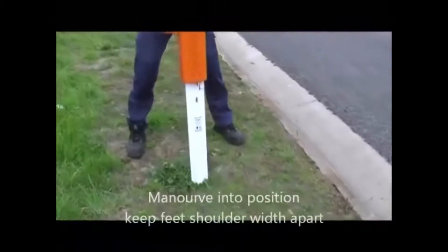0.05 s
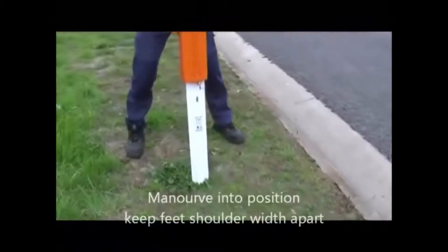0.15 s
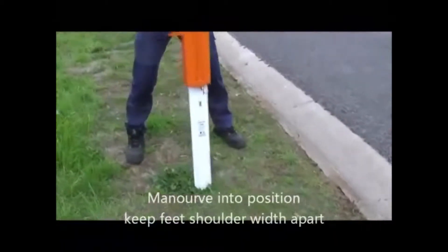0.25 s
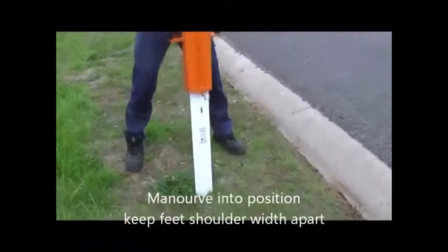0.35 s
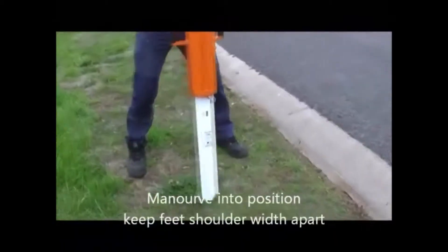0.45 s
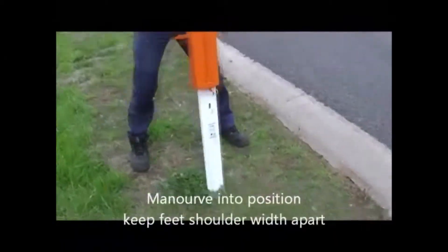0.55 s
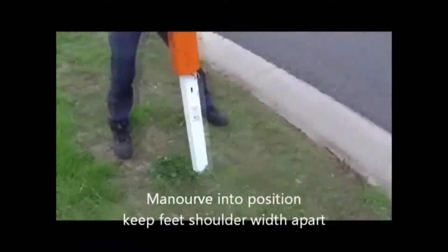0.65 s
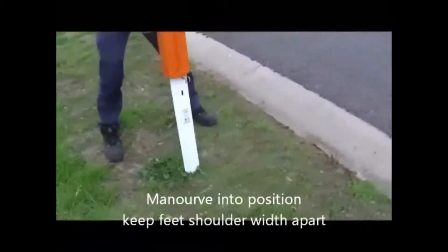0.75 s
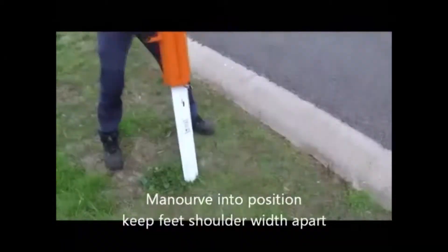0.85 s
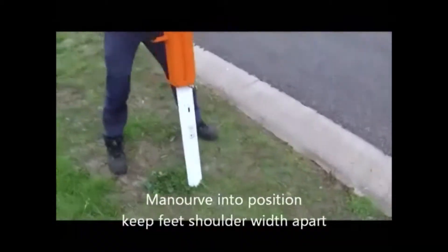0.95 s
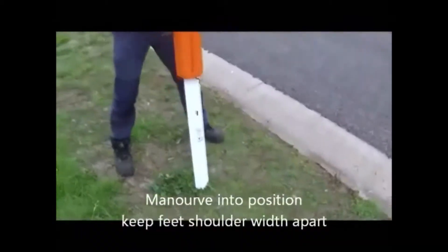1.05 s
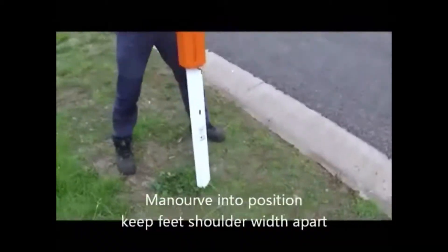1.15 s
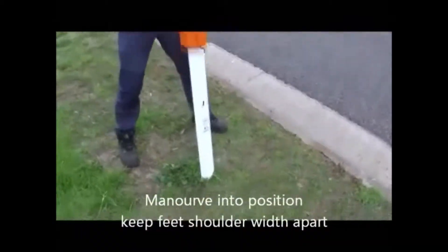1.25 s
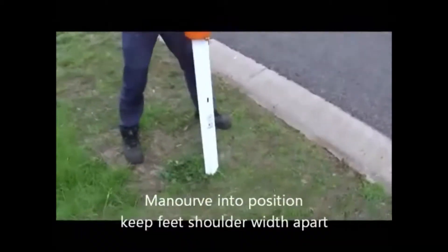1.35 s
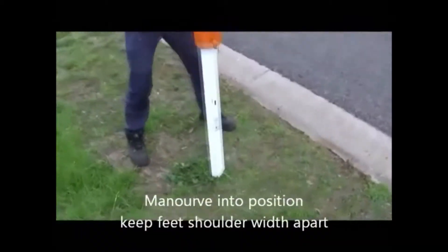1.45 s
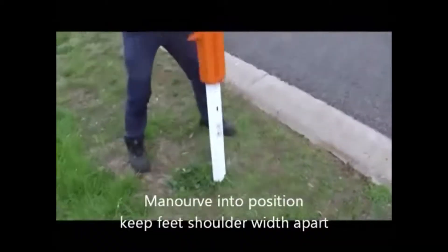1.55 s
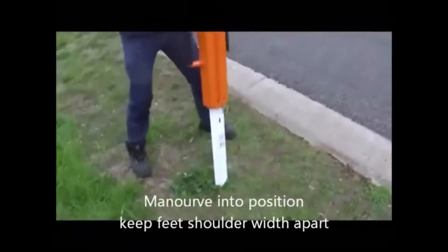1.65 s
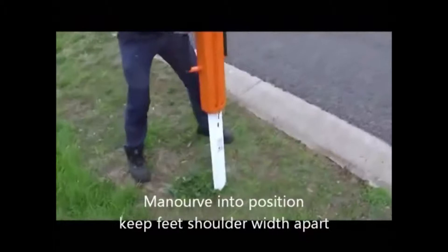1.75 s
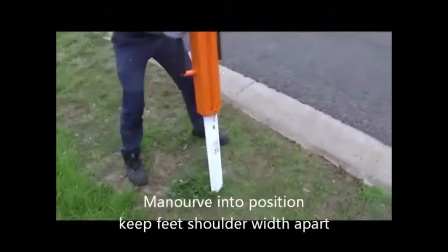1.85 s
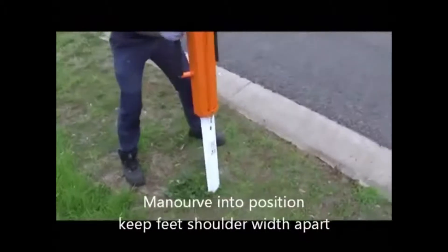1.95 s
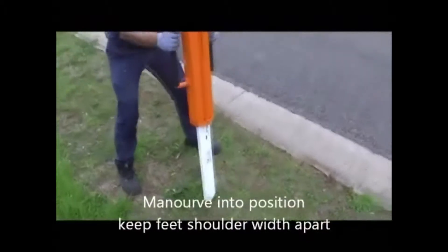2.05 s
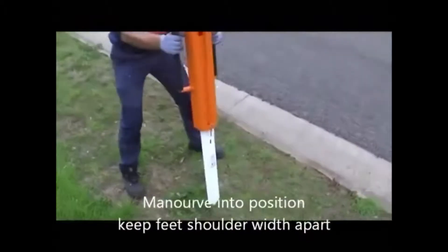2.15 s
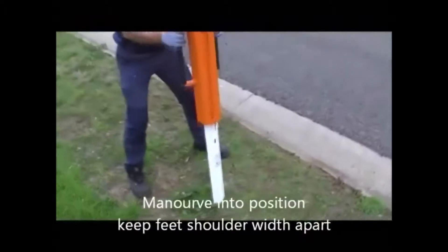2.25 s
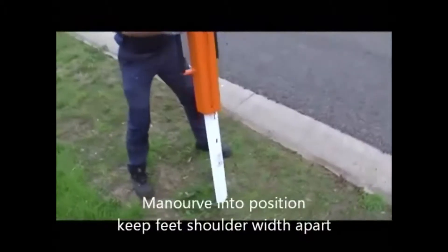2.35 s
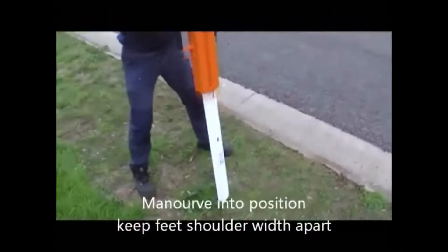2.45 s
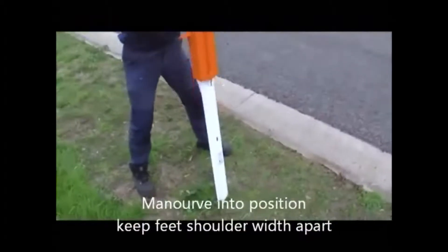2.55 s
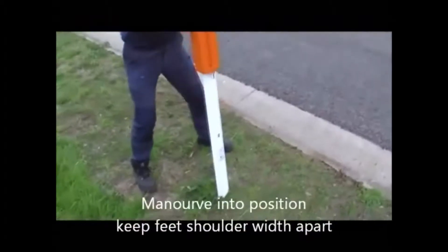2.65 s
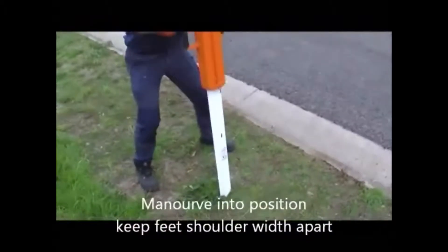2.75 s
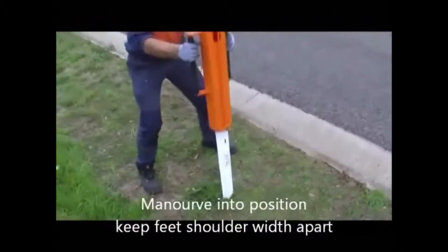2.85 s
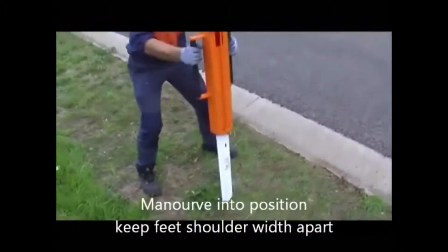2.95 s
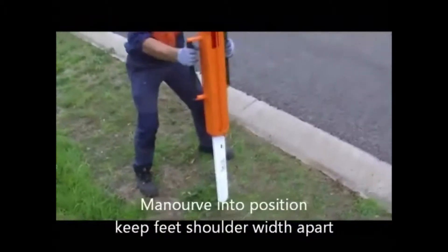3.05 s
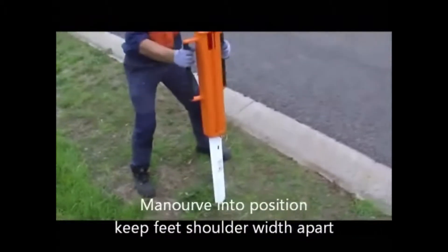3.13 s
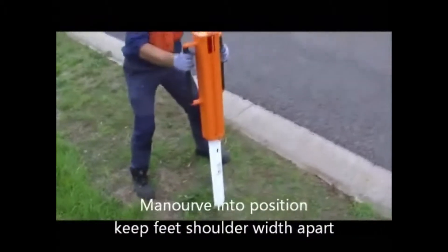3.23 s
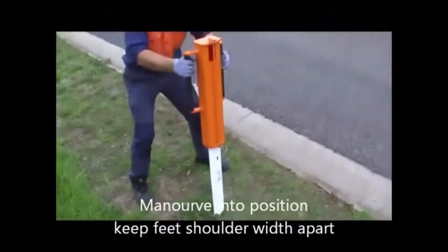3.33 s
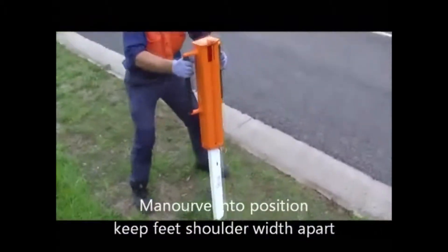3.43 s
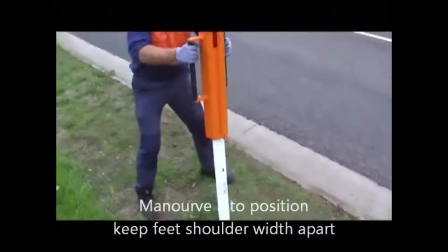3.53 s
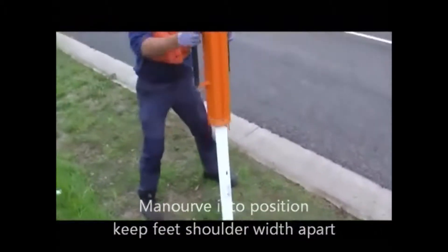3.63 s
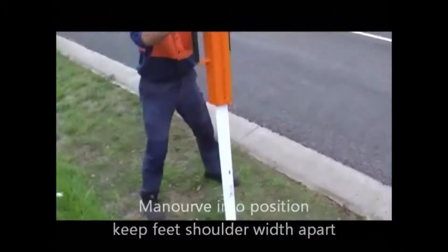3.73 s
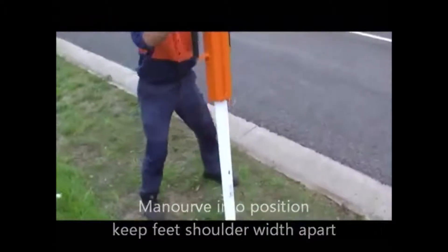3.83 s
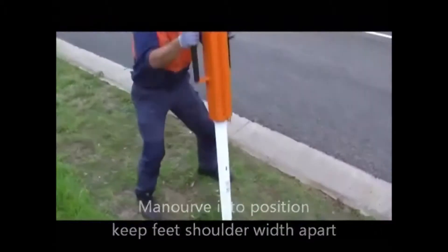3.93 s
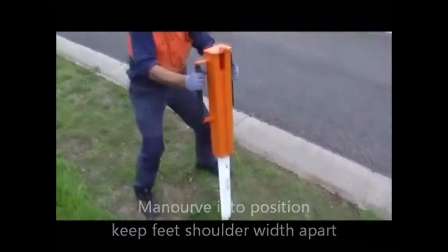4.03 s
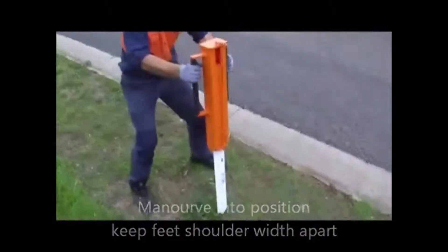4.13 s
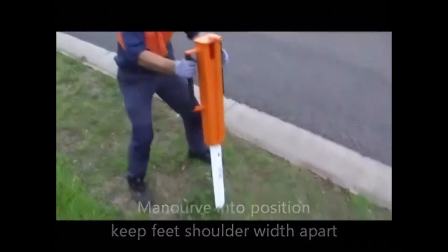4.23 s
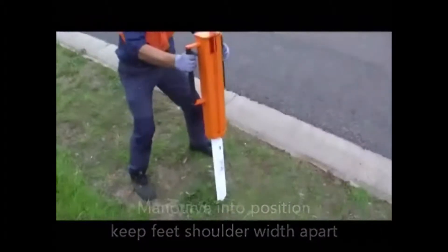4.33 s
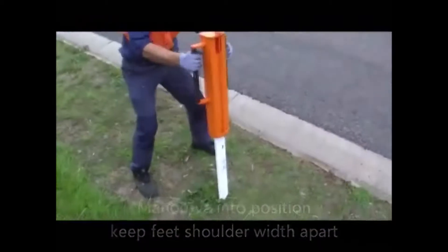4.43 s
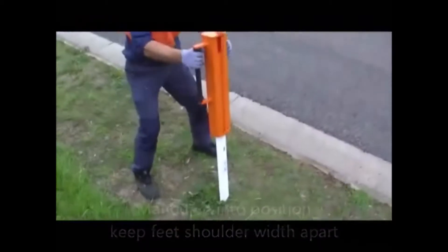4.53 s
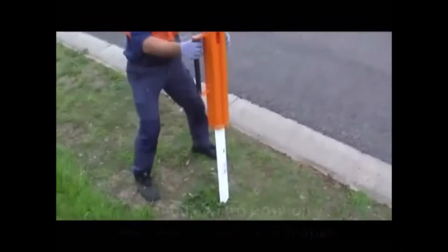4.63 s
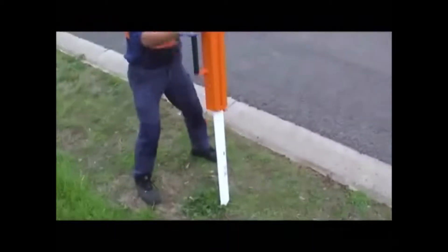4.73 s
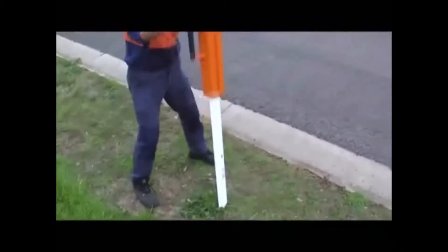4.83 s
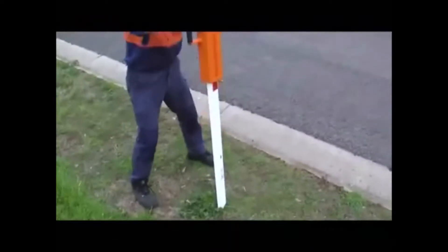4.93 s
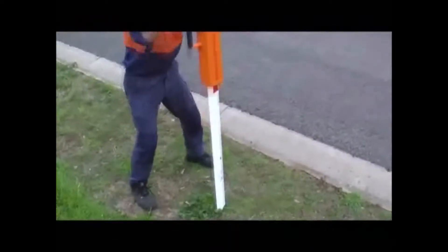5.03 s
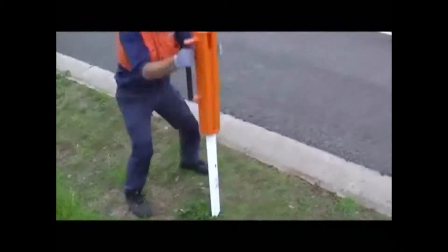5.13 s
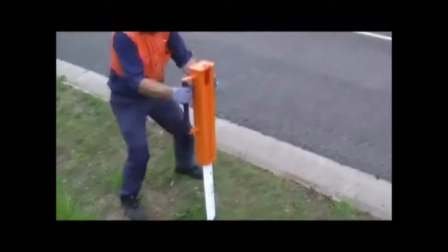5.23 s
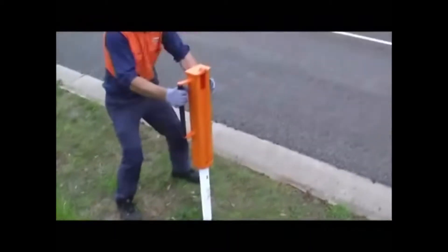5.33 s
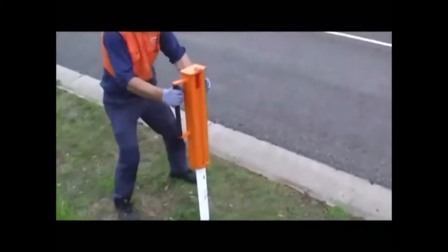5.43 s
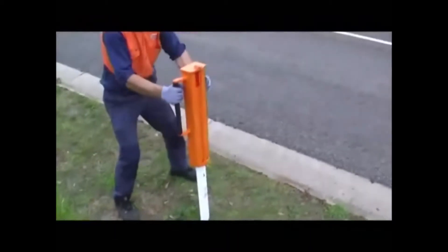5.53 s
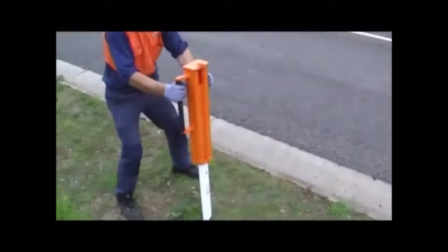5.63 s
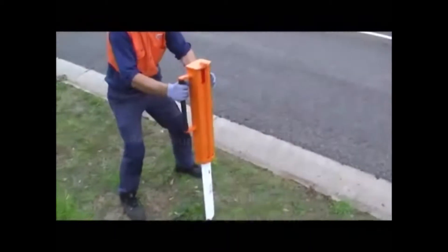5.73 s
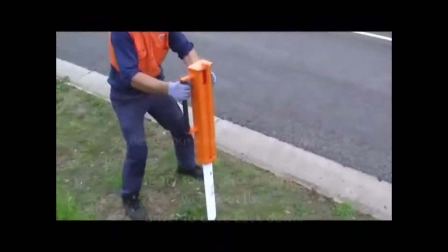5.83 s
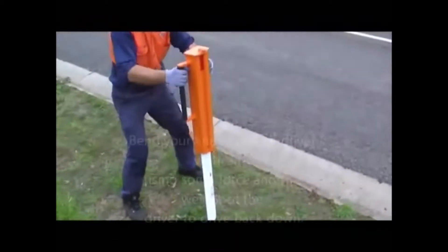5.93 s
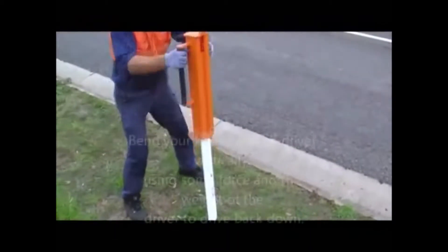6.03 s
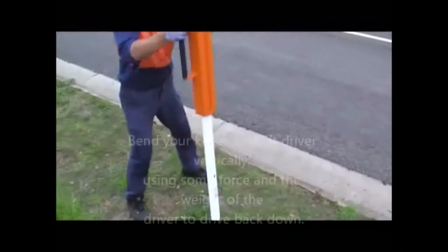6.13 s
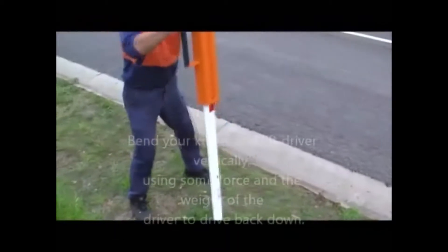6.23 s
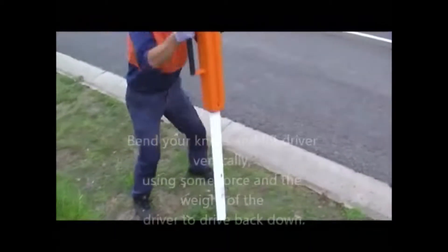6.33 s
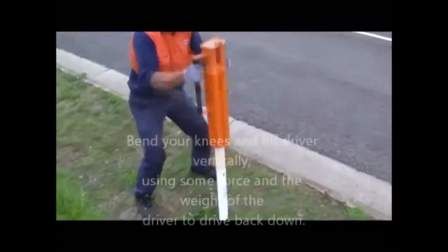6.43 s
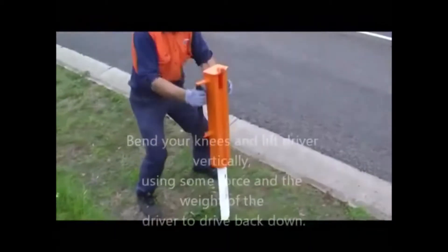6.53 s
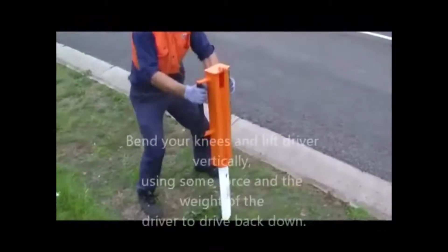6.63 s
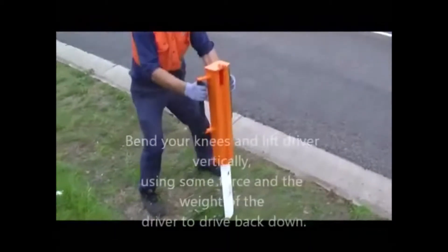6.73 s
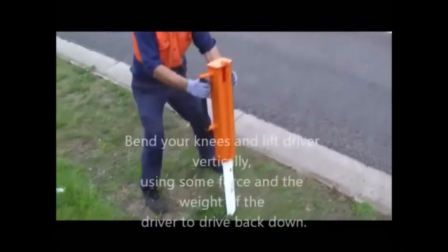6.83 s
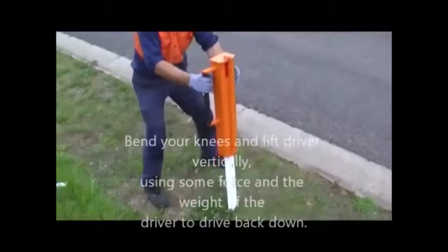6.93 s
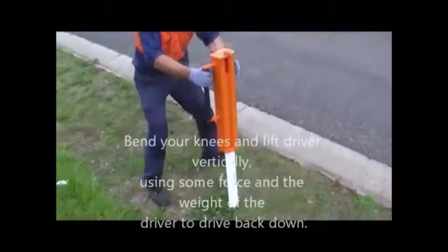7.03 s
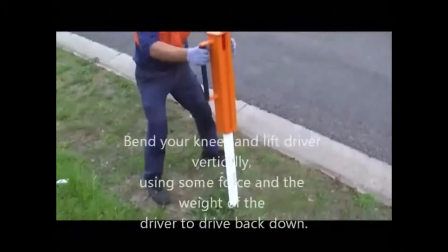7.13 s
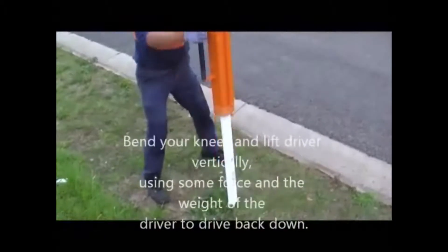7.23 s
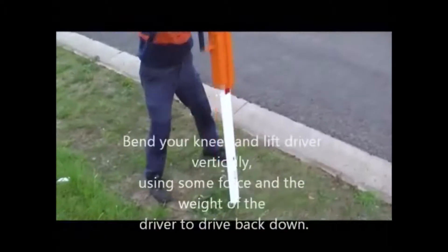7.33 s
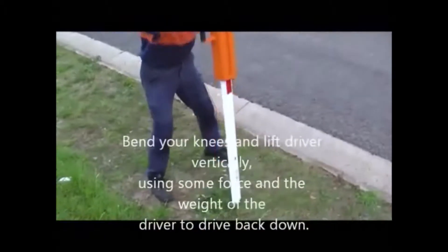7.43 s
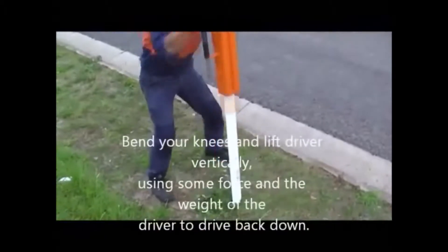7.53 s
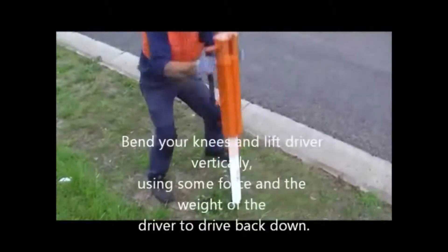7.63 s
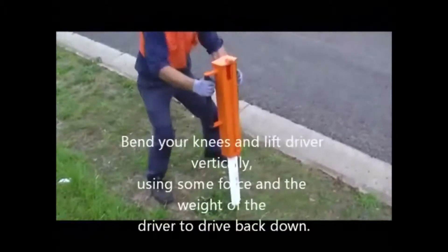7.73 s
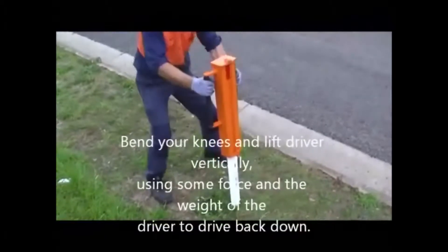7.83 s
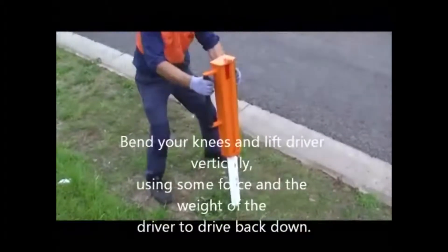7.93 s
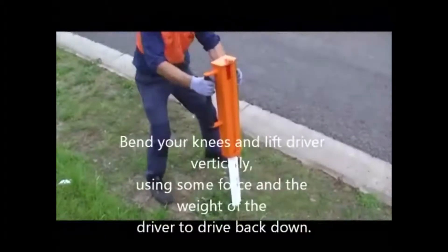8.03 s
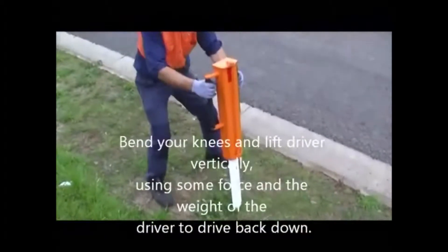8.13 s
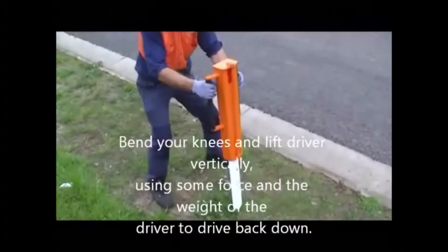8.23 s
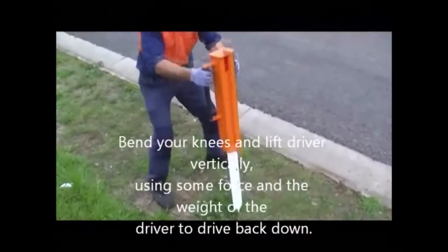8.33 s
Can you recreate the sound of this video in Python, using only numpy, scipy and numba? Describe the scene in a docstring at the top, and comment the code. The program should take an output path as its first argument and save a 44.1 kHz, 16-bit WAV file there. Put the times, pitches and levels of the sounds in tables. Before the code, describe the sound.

A heavy steel tube is lifted and slammed onto a metal post six times, ringing brightly, beside a road with a car leaving and a diesel approaching.

```python
"""A grass verge by a road, where a hand-held steel post driver is lifted and dropped six times onto a steel post.
A car rolls off as noise bands, its brake squeals as two wobbling tones, and a diesel nears as firing harmonics.
The tube ticks, clanks and scrapes as rough noise bursts; blows, knocks and scraping ring decaying steel modes
until gloves choke them. An automatic gain control dives at each blow and creeps back."""
import sys
import numpy as np
from scipy import signal
from scipy.fft import rfft, irfft, next_fast_len
from scipy.io import wavfile
from scipy.ndimage import uniform_filter1d
from numba import njit

SR = 44100
rng = np.random.default_rng(int(sys.argv[2]) if len(sys.argv) > 2 else 0)


def linear_from_db(decibels):
    """Turn decibels (scalar or array-like) into linear amplitude factors; 0 gives 1."""
    return 10 ** (np.asarray(decibels, float) / 20)


def int16_out(signal):
    """Quantize to a 16-bit WAV file."""
    q = np.round(np.clip(np.atleast_2d(signal).T, -1, 1) * 32767)
    wavfile.write(sys.argv[1], SR, q.astype(np.int16))


N = 369116
T = np.arange(N) / SR  # time [s]
SIZE = next_fast_len(N)
F = np.arange(SIZE // 2 + 1) * SR / SIZE + 1  # frequency [Hz], shifted by 1 so that its log exists

# passing traffic: (time [s], tyre level [dB], engine firing rate [Hz], engine level [dB])
TRAFFIC = [(0, -24, 26.1, -43.5), (.6, -29, 26, -48.5), (1.2, -30, 26.05, -40), (1.7, -32.5, 26.06, -41),
           (2.1, -33.5, 25.88, -40), (2.7, -40, 26.02, -43.5), (3.6, -43, 26.05, -41),
           (4.3, -46, 25.97, -45), (5.3, -44, 26.74, -42.5), (6.3, -43.5, 26.48, -45),
           (7.0, -44, 26.84, -44), (7.6, -38.5, 26.79, -40.5), (8.0, -30, 26.98, -33.5),
           (8.37, -28.5, 26.96, -29)]
# colour of the tyre roar: (frequency [Hz], level [dB per Hz])
TYRE_COLOUR = [(18, -60.5), (30, -11.5), (152, -14.5), (206, -2.5), (281, -4.5), (991, 0.5), (2200, -16),
               (4630, -24), (6990, -28.5), (7550, -25.5), (8370, -30), (11700, -46), (14000, -54.5),
               (15500, -85)]
# engine harmonics: (multiple of the firing rate, level [dB])
DIESEL_HARMONICS = [(5, -20), (6, -11.5), (7, -2.5), (8, 2), (11, -16), (12, -23.5), (13, -8.5),
                    (14, -17.5), (15, -13.5), (16, -14.5), (18, -18.5), (19, -7.5), (21, -21.5), (22, -22),
                    (24, -16)]
# faint dry ticks as the tube is shifted about: (time [s], level [dB])
TICKS = [(.549, -28), (0.612, -27), (.92, -31), (1.22, -37), (1.533, -49)]
# heavy blows: (time [s], crack level [dB], rattle level [dB], ring level [dB], thud level [dB])
BLOWS = [(1.732, 10, 11, 11.5, -18), (2.981, 6, 5, 9, -17.5), (4.1732, -7, 2.5, 9, -24),
         (5.348, 1, 3, 7.5, -21), (6.6211, 3.5, -3, 8.5, -25), (7.8124, 11, -3, 9.5, -25)]
# tube touching the post: (time [s], scrape level [dB], clank relative to it [dB], time to fall 60 dB [s])
KNOCKS = [(1.498, -53, -10, 0.037), (1.601, -21.5, 5.5, 0.12), (1.642, -11.5, 0, .17), (1.75, 4, -6, .2),
          (1.841, -15, -4, 0.087), (2.391, -46, 1, .06), (2.544, -48, 13, 0.12), (2.774, -46, -1, 0.064),
          (2.851, -23.5, -0.5, 0.43), (2.878, -20.5, 2.5, 0.18), (2.955, -30, 5, 0.26),
          (3.472, -39.5, -8.5, 0.062), (3.508, -43.5, 15, 0.074), (3.56, -54, 14.5, 0.057),
          (3.772, -39.5, 7, .1), (4.023, -20, -0.5, 0.15), (4.037, -10.5, -11, 0.042),
          (4.044, -24.5, -4.5, .15), (4.12, -35.5, 6, .12), (4.153, -24.5, 5, 0.45), (4.31, -23, 2, 0.066),
          (4.455, -23, -27, 0.053), (4.507, -15, -15, 0.088), (4.738, -48, 14.5, 0.063),
          (5.146, -59, 19.5, 0.031), (5.19, -27.5, 0.5, 0.45), (5.282, -36, 10, .07), (5.31, -29.5, 1, 0.2),
          (5.332, -28, -0.5, 0.26), (5.41, -14, 2, 0.06), (5.478, -16, 4, 0.11), (5.859, -49, 3, .05),
          (5.947, -44, 10.5, 0.17), (5.958, -41.5, 14.5, 0.091), (6.177, -43, 4.5, 0.11),
          (6.438, -22, -1.5, 0.18), (6.468, -20.5, -1.5, 0.19), (6.549, -44, 14, 0.073),
          (6.606, -25, -0.5, 0.24), (6.71, -22, -3, 0.098), (6.759, -17, 2.5, 0.095),
          (6.945, -31, -15, .05), (7.007, -24.5, -20, 0.09), (7.042, -28.5, -5, .05),
          (7.139, -40, 11.5, 0.069), (7.27, -54, 16, 0.077), (7.312, -57, 18, .06), (7.53, -45, 17, 0.12),
          (7.563, -41.5, -3, 0.27), (7.618, -28, 2, 0.19), (7.645, -28.5, -3, 0.12), (7.746, -33, 2.5, .15),
          (7.801, -19.5, -5, .2), (7.88, -20.5, 7, 0.053), (7.965, -20, 3.5, 0.072), (8.057, -26, 2, 0.054),
          (8.125, -34.5, 6, 0.043)]
# tube sliding along the post: (start [s], length [s], scrape level [dB], low part relative to it [dB])
SLIDES = [(1.319, 0.066, -46.5, -20), (2.123, 0.042, -45, -6), (2.4, 0.51, -53.5, -10),
          (3.554, 1, -54.5, 0), (4.926, 0.11, -54, -13), (6.103, 0.37, -62.5, 5.5), (7.345, 0.68, -58.5, 6)]
# rebound in loose hands after each blow, in the same order:
# (free time [s], loss in the loose grip [dB/s], peak chafing level [dB], share that rings [dB])
REBOUNDS = [(0.21, 124.5, -33, 2), (0.16, 97.5, -26, 3.5), (0.41, 42.5, -30, 21.5), (.38, 12, -23.5, 9.5),
            (.42, 22, -27, 12.5), (0.26, 26, -26.5, 6)]
# colour of the sharp crack: (frequency [Hz], level [dB per Hz])
CRACK_COLOUR = [(59, -54.5), (100, -28), (570, -8.5), (818, -0.5), (1420, -3), (2270, -6.5), (3190, -5),
                (3860, -6), (5080, -10.5), (6150, -3.5), (8000, -13), (11000, -27.5), (16000, -41.5)]
# colour of the bright scrape: (frequency [Hz], level [dB per Hz])
SCRAPE_COLOUR = [(2500, -42), (4000, -3.5), (5500, 4.5), (7000, 7.5), (8500, -1), (11000, -15.5),
                 (13000, -33.5), (16000, -60.5)]
# colour of the low clank: (frequency [Hz], level [dB per Hz])
CLANK_COLOUR = [(300, -21.5), (700, 3), (1400, 4), (2500, 3), (3800, -2), (5500, -23)]
# colour of the thud of post and ground: (frequency [Hz], level [dB per Hz])
THUD_COLOUR = [(40, -25), (120, -5.5), (300, -8.5), (600, -7.5), (880, -1.5), (1200, -11), (2000, -38.5)]
# main modes of tube and post, one entry each: (frequency [Hz])
STEEL_HZ = [860, 1320, 1440, 1645, 1851, 2105, 2406, 2745, 3130, 3430, 3550, 4148, 4517, 4861, 4991, 5240,
            5370, 5786, 6020, 6321, 6668, 6760, 6969, 7584, 7821, 8513, 8747, 9488, 9730, 9921, 10500,
            10780, 10870, 11700, 11890, 12690, 13070, 13630, 14010, 14350]
# the same modes: (level [dB])
STEEL_DB = [-12, -18, -13, -16.5, -14.5, -27, -12, -13, -18, -21, -29, -23, -23.5, -21, -11, -14, -13.5, -5,
            -6, -7.5, -2.5, -3.5, -3.5, -5, -6, -16, -8.5, -16.5, -24, -31.5, -30, -25, -22, -29.5, -22,
            -31, -32.5, -33.5, -35.5, -37]
# the same modes: (time to fall 60 dB, before the grip shortens it [s])
STEEL_T60 = [0.071, 0.13, .1, 0.24, 0.71, 0.33, 0.39, 0.48, 0.44, 0.85, 0.21, .5, 0.73, 0.59, 0.99, 0.66,
             .3, 0.89, 0.92, 0.44, 0.82, 0.77, .9, 0.88, 0.84, .7, 0.65, .5, 0.69, 0.36, .5, .5, 0.74, .5,
             0.48, 0.57, .3, 0.44, .4, 0.36]


def level(x):
    """Scale to rms 1."""
    return x / np.sqrt(np.mean(x ** 2))


def curves(table):
    """Columns of a table, joined over time."""
    s, *columns = np.transpose(table)
    return [np.interp(T, s, c) for c in columns]


def colour(points):
    """Amplitude at each frequency, from a table of (frequency [Hz], level [dB])."""
    hz, db = np.transpose(points)
    return linear_from_db(np.interp(np.log(F), np.log(hz), db, left=-90))


def noise(points, peaks=1):
    """Noise of a given spectrum, times any fine resonances."""
    spectrum = rfft(rng.standard_normal(SIZE))
    return level(irfft(spectrum * peaks * colour(points), SIZE)[:N])


def walk(rate):
    """Random levels held 1 / rate s and slewed twice; spread near 1."""
    k = int(SR / rate)
    steps = np.repeat(rng.standard_normal(N // k + 1), k)
    return 1.55 * uniform_filter1d(uniform_filter1d(steps, k), k)[:N]


def add(env, s, db, t60, rise=0.0024):
    """Add a quick rise and an exponential fall to an envelope."""
    i = int(s * SR)
    t = T[:min(N - i, int(1.5 * t60 * SR) + 8)]
    env[i:i + len(t)] += linear_from_db(db - 60 * t / max(t60, .005)) * (1 - np.exp(-t / rise))


def tyres(tyre_db):
    """Tyres on the road make a wide roar: noise that wavers slowly, partly different on the two sides."""
    mid = noise(TYRE_COLOUR) * linear_from_db(0.47 * walk(4.3))
    hz = np.array(TYRE_COLOUR)[:, 0]
    tilt_db = np.interp(np.log(hz), np.log([100, 300, 2000, 9000]), [9.5, -5.5, -5.5, -9])
    side = noise(np.add(TYRE_COLOUR, np.transpose([np.zeros(len(hz)), tilt_db])))
    left = (mid + linear_from_db(-4) * side) * linear_from_db(-0.3)
    right = (mid - linear_from_db(-13.5) * side) * linear_from_db(0.0)
    return linear_from_db(tyre_db) * np.array([left, right])


def diesel(firing_hz, engine_db):
    """Cylinders firing make a harmonic drone, stronger on the left; distance dulls all but one harmonic."""
    far_dull_db, clear_db = -13.5, 3.5  # side harmonics far off and near by
    clears_from_s, clears_db_s = 3.73, 5  # when they start to come out, and how fast
    upper_db = np.clip(far_dull_db + clears_db_s * (T - clears_from_s), far_dull_db, clear_db)
    phase = 2 * np.pi * np.cumsum(firing_hz * (1 + 0.00098 * walk(4))) / SR
    drone = 0
    for k, db in DIESEL_HARMONICS:
        reach_db = 0 if k == 8 else upper_db * (.4 if k < 8 else 1)
        tone = np.sin(k * phase + rng.uniform(0, 2 * np.pi))
        drone = drone + linear_from_db(db + reach_db + 1.6 * walk(7.2)) * tone
    return np.sqrt(2) * linear_from_db(engine_db) * drone * linear_from_db(np.array([[2.0], [-2.0]]))


def brake_squeal():
    """A rubbing brake sings: a wobbling tone and a faint overtone that rise fast, sag and die away."""
    squeal_hz, overtone_hz, overtone_db = 7450, 11400, -26
    peak_s, peak_db, rise_db_s, sag_db_s = 0.48, -37, 170, 20
    end_s, end_db_s = 1.4, 149  # the final fall comes on top of the sag
    db = peak_db + 4.4 * walk(40) + 1.1 * walk(10.6)
    db += np.minimum(rise_db_s * (T - peak_s), sag_db_s * (peak_s - T))
    db -= end_db_s * np.maximum(T - end_s, 0)
    wobble = 2 * np.pi * np.cumsum(1 + 0.0046 * walk(370)) / SR
    tones = np.sin(squeal_hz * wobble) + linear_from_db(overtone_db) * np.sin(overtone_hz * wobble)
    return np.sqrt(2) * linear_from_db(db) * tones


def traffic():
    """Tyres, engine and brake add up to the sound of the road."""
    tyre_db, firing_hz, engine_db = curves(TRAFFIC)
    return tyres(tyre_db) + diesel(firing_hz, engine_db) + brake_squeal()


def hands():
    """Slides and rebounds set the scrape, its low part and ringing share; the grip drains the ringing."""
    rest_db = -63.5  # faint rubbing in between
    slide_edge_s = 0.031  # fade of a slide
    chafe_rise_db, chafe_low_db = 24, -16.5  # growth of the chafing to its peak; its low part at the end
    close_s, clutch_db_s = .065, 400  # the gloves close and clutch
    held_db_s, first_held_db_s = 299, 146  # then hold; lighter before the first blow
    scrape_db, low_db, share_db = np.full(N, rest_db), np.zeros(N), np.zeros(N)
    grip = np.where(T < BLOWS[0][0], 1. * first_held_db_s, held_db_s)
    for s, length, db, part_db in SLIDES:
        corners = s + np.array([-slide_edge_s, 0, length, length + slide_edge_s])
        on = np.interp(T, corners, [0, 1, 1, 0])
        scrape_db += on * (db - rest_db)
        low_db += on * part_db
    for (s, *_), (free, loss, db, rings_db) in zip(BLOWS, REBOUNDS):
        shut = free + close_s
        held = shut + 2 * close_s
        now = (T >= s) & (T < s + held)
        t = T[now] - s
        scrape_db[now] = np.interp(t, [0, 0.52 * free, 0.657 * free, free, shut],
                                   [db - chafe_rise_db, db - 8.5, db, db - 5.5, rest_db + 5])
        low_db[now] = np.interp(t, [0.36 * free, free, shut], [0, chafe_low_db, 6])
        share_db[now] = np.interp(t, [0, .5 * free, free, shut], [0, rings_db, rings_db, 0])
        grip[now] = np.interp(t, [.7 * free, free, shut, held], [loss, loss + 50, clutch_db_s, held_db_s])
    return scrape_db, low_db, share_db, grip


def lesser_modes(count, db=-21, slope_db=-18, t60=0.69):
    """The tube wall has many weaker modes, spread evenly with scatter, fainter away from its best band."""
    hz_chance, db_chance, t60_chance = rng.standard_normal((count, 3)).T
    hz = np.linspace(1000, 14500, count) + 70 * hz_chance
    mode_db = db + slope_db * np.abs(np.log2(hz / 6500)) ** 1.6 + 4.5 * db_chance
    return np.transpose([hz, mode_db, t60 * np.exp(.3 * t60_chance)])


def mode_peaks(modes):
    """Pressed together, tube and post show their modes as wider peaks."""
    return sum(1 / (1 + ((F - hz) / 16.) ** 2) for hz in modes[:, 0])


def patchy(points, peaks, bands_hz, patchy_db, rate):
    """Noise bands swell and sink independently, at random."""
    windows = [np.exp(-np.log2(F / hz) ** 2 / .12) for hz in bands_hz]
    total = sum(window ** 2 for window in windows) ** .5 + 1e-9
    out = 0
    for window in windows:
        band = peaks * window / total
        weight = np.sqrt(np.mean((band * colour(points)) ** 2))
        out = out + weight * linear_from_db(patchy_db * walk(rate)) * noise(points, band)
    return level(out)


def contacts(high, low, grit, damped):
    """Ticks, knocks and blows are rough noise bursts through hand-damped steel; blows also thud."""
    crack, thud = np.zeros(N), np.zeros(N)
    for s, db in TICKS:
        add(high, s, db, t60=0.032)
    for s, db, clank_db, t60 in KNOCKS:
        rise_s = min(0.044 * t60, 0.0041)  # long contacts start softly, up to a limit
        add(high, s, db, t60, rise_s)
        add(low, s, db + clank_db, t60, rise_s)
    for s, db, rattle_db, _, thud_db in BLOWS:
        add(crack, s, db, .05)
        add(low, s, db - 8.5, .13)
        add(crack, s, rattle_db, t60=.27)
        add(thud, s, thud_db, .35, .003)
    rough = high * patchy(SCRAPE_COLOUR, damped, [3500, 5000, 6500, 8400, 12100], 1.8, 40)
    rough += low * patchy(CLANK_COLOUR, damped, [715, 1110, 1610, 2390, 3670], 3.2, 30)
    rough += crack * noise(CRACK_COLOUR, np.sqrt(damped))
    return grit * rough + thud * noise(THUD_COLOUR)


@njit
def ring(x, kicks, turn, fade, hold):
    """One mode: noise and kicks push it, its own loss and the grip drain it."""
    y, z, p = np.empty(len(x)), 0j, fade * np.exp(1j * turn)
    for i in range(len(x)):
        z = z * p * hold[i] + x[i] + kicks[i] + 1e-18
        y[i] = z.imag
    return y


def ringing(modes, push, grip):
    """Each blow and knock kicks every steel mode; scraping noise also drives them; loss and grip stop them."""
    knock_ring_db = -5  # how hard a knock sets the modes ringing
    hold = linear_from_db(-np.maximum(grip, 0) / SR)
    blow, knock = np.array(BLOWS), np.array(KNOCKS)
    times = np.r_[blow[:, 0], knock[:, 0]]
    # the modes start at slightly different, random moments
    spread = np.r_[np.full(len(blow), .003), .05 * knock[:, 3]]
    waver = [linear_from_db(3.8 * walk(35)) for _ in range(7)]  # the ringing tones waver in level at random
    rung = 0
    for k, (hz, db, t60) in enumerate(modes):
        at = ((times + spread * rng.random(len(spread))) * SR).astype(int)
        # side knocks favour the low bending modes and the highest ones
        if hz < 4000:
            clank_db = knock[:, 2] + 9
        else:
            clank_db = -.8 * np.maximum(knock[:, 2], 0) + 8 * (hz > 9000)
        # every kick differs in strength from mode to mode, at random
        scatter_db = np.r_[4.0 * rng.standard_normal(len(blow)), 5.0 * rng.standard_normal(len(knock))]
        kick_db = np.r_[blow[:, 3], knock[:, 1] + knock_ring_db + clank_db] + scatter_db
        kicks = np.zeros(N)
        kicks[at] = linear_from_db(kick_db) * (-1) ** k
        fade = float(linear_from_db(-60 / max(t60, .02) / SR))
        tone = ring(push, kicks, 2 * np.pi * hz / SR, fade, hold)
        rung += linear_from_db(db - 12.5) * waver[k % len(waver)] * tone
    # keep the ringing between 550 and 12500 Hz
    band = signal.butter(2, [550, 12500], "band", fs=SR, output="sos")
    return signal.sosfilt(band, rung)


def echoes(sound):
    """The kerb and the worker's body send faint, bright echoes, opposite on the two sides."""
    bright = np.diff(0.14 * np.roll(sound, 37) - 0.093 * np.roll(sound, 211), prepend=0)
    echo = bright + 0.15 * np.roll(sound, 95)
    return np.array([(sound + echo) * linear_from_db(3.0), (sound - echo) * linear_from_db(1.8)])


def driver():
    """Tube and post rub and strike each other; rubbing, knocks and blows also set the steel ringing."""
    scrape_db, low_db, share_db, grip = hands()
    main, lesser = np.transpose([STEEL_HZ, STEEL_DB, STEEL_T60]), lesser_modes(count=60)
    damped = np.sqrt(.03 + mode_peaks(main) + .35 * mode_peaks(lesser))
    grit = linear_from_db(1.3 * walk(200) + 3.13 * walk(30))  # rust and paint catch unevenly
    # what goes into ringing is lost to the hiss
    high = linear_from_db(scrape_db) * linear_from_db(-.4 * np.maximum(share_db, 0))
    low = linear_from_db(scrape_db + low_db)
    push = grit * linear_from_db(scrape_db + share_db + 8) * rng.standard_normal(N) / np.sqrt(SR)
    struck = contacts(high, low, grit, damped)
    return echoes(struck + ringing(np.vstack([main, lesser]), push, grip))


def scene():
    """The road and the post driver sound together."""
    return traffic() + driver()


@njit
def gain_control(peak, top_db, attack, fall, rise_db):
    """Pulls loud peaks to the top level within milliseconds, then climbs back at a steady dB rate."""
    gain_db, e, g = np.empty(len(peak)), 1e-6, 0.
    for i in range(len(peak)):
        e = max(peak[i], e * fall)
        want = min(0., top_db - 20 * np.log10(e))
        g = g + attack * (want - g) if want < g else min(want, g + rise_db)
        gain_db[i] = g
    return gain_db


def roll_off(x):
    """The treble ends steeply here."""
    return signal.sosfilt(signal.butter(12, 16430, fs=SR, output="sos"), x)


def record(dry):
    """Gain control is too slow for the first milliseconds, which clip; the microphone pair splits the bass."""
    # the microphone pair hears bass as a difference
    bass = signal.sosfiltfilt(signal.butter(2, 85, fs=SR, output="sos"), dry.mean(axis=0))
    dry = dry - bass * (0.12 + .8 * np.array([[1], [-1]]))
    # attack over 2.7 ms; the peak reading falls 900 dB/s, the gain climbs 32.5 dB/s
    gain_db = gain_control(np.abs(dry).max(axis=0), -4.0, 1 / (0.0027 * SR), float(linear_from_db(-900 / SR)), 32.5 / SR)
    hiss = linear_from_db(-88.5) * rng.standard_normal(dry.shape)
    rumble = noise([(15, -4.5), (40, -1.5), (120, -2.0), (250, -31.5)])
    hiss += linear_from_db(-67.5) * rumble * np.array([[1.3], [-.7]])
    mix = np.clip(dry * linear_from_db(gain_db) + hiss, -.88, .88)
    # bass common to both sides is cut
    mix -= .75 * signal.sosfiltfilt(signal.butter(2, 90, fs=SR, output="sos"), mix.mean(axis=0))
    low_pass = signal.ellip(8, .2, 60, 15600, fs=SR, output="sos")
    mix = signal.sosfilt(low_pass, mix)
    return roll_off(mix)


dry = scene()
out = record(dry)
int16_out(out)
```